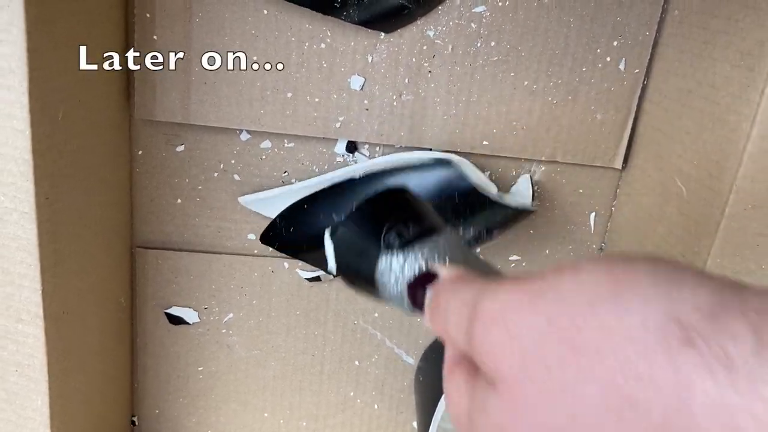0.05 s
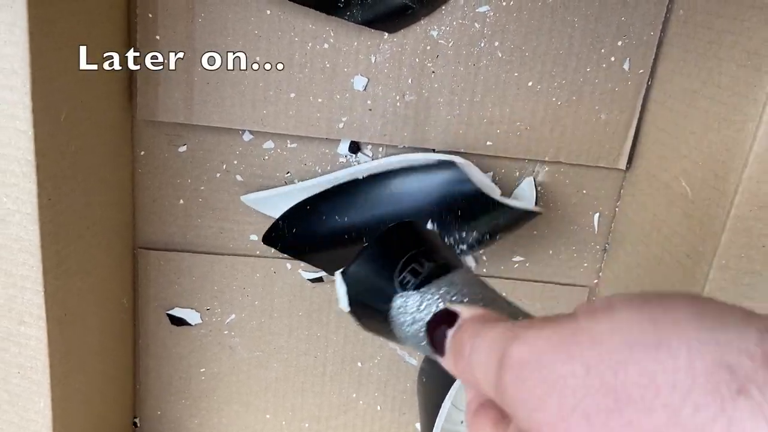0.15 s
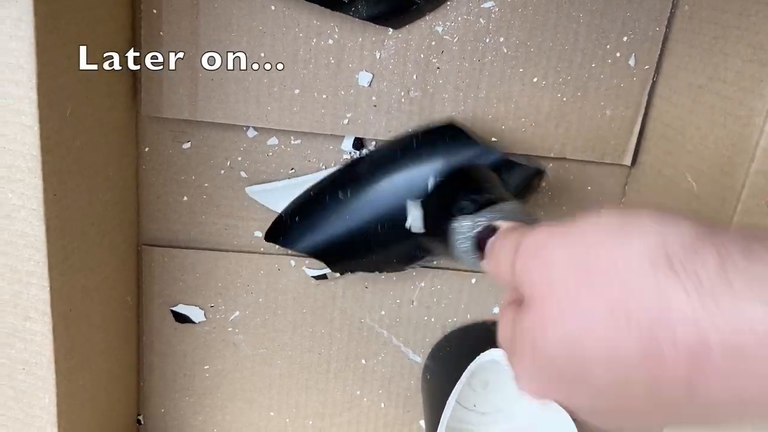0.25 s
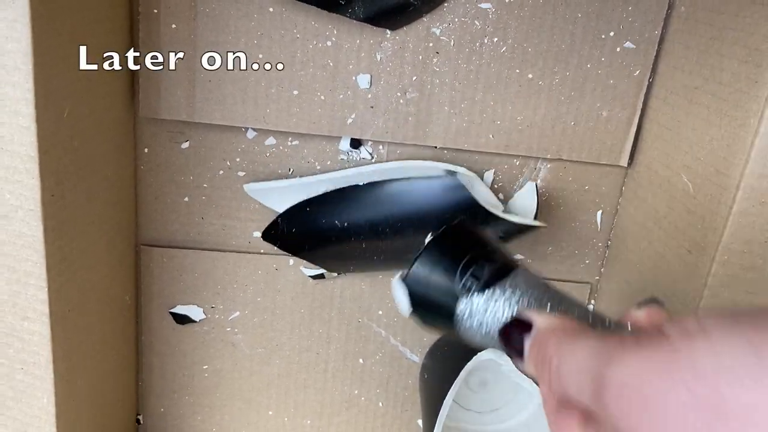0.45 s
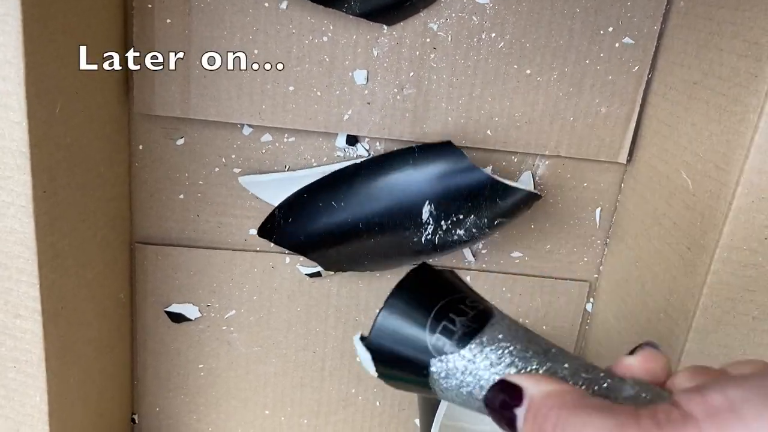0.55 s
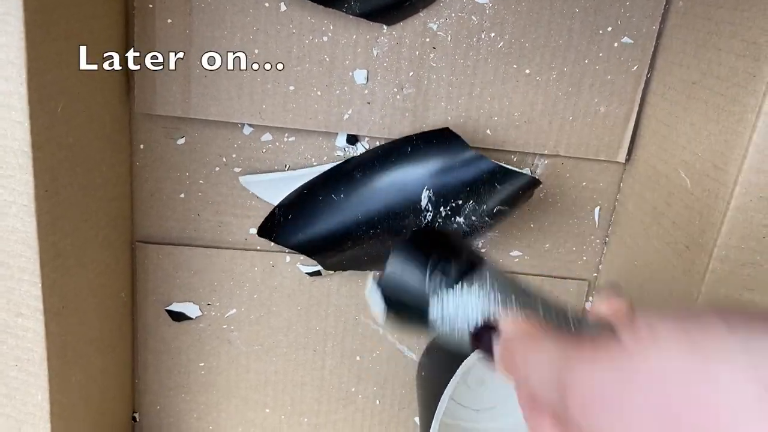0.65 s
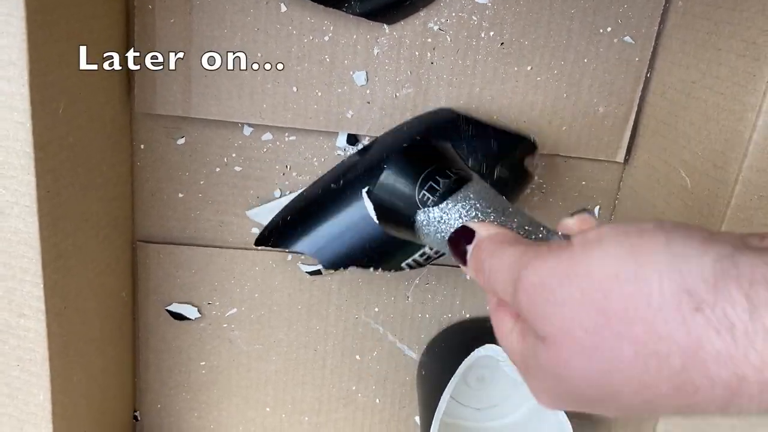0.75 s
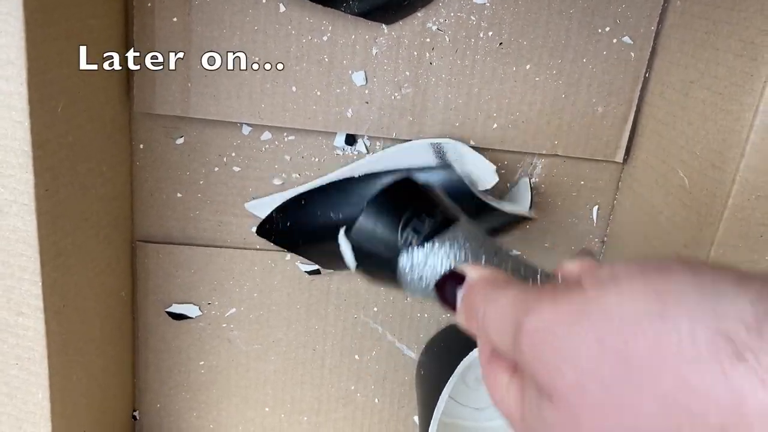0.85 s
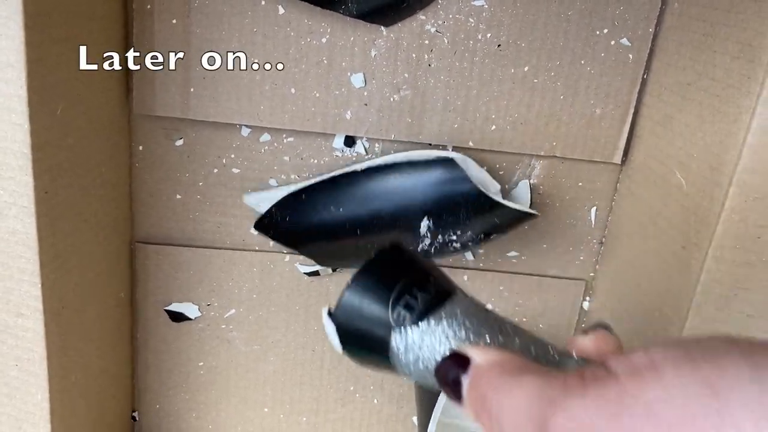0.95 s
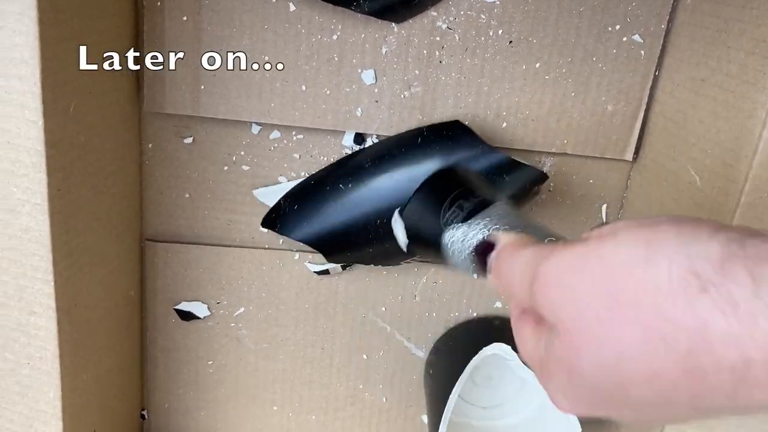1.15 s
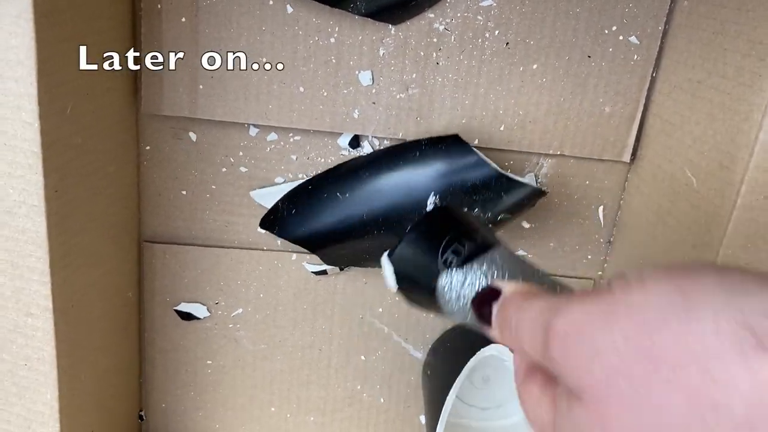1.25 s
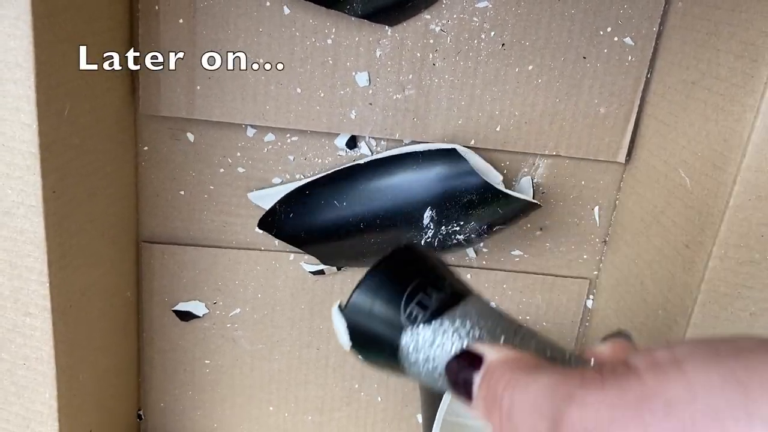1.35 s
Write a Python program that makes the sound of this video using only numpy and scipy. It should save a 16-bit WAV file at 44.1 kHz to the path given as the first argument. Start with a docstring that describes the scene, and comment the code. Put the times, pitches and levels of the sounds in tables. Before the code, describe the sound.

A hammer-like tool strikes a ceramic shard three times, close up in a small room. Each blow crunches, rings briefly and thumps the cardboard box beneath. Between blows the shard rocks, clinks and scrapes while tiny chips tick.

```python
"""In a small room, close to a phone, a hammer-like tool hits a curved ceramic shard in a cardboard box.
Each of the three blows crunches the edge, makes the trapped shard ring briefly and makes the box boom.
Once free, the shard rocks, clinks, taps and scrapes, while little chips tick around it.
Behind it all are a short echo, a low rumble and a faint hiss."""
import sys
import numpy as np
from scipy import signal
from scipy.fft import rfft, irfft
from scipy.io import wavfile

SR = 44100
rng = np.random.default_rng(int(sys.argv[2]) if len(sys.argv) > 2 else 0)


def unload_wav(signal):
    """Save mono or channel-first audio to the path in sys.argv[1] as 16-bit WAV at rate SR, clipped to [-1, 1]."""
    wavfile.write(
        sys.argv[1],
        SR,
        np.round(np.clip(np.atleast_2d(signal).T, -1, 1) * 32767).astype(np.int16),
    )


N = 61739
T = np.arange(N) / SR
FREQS = np.maximum(np.fft.rfftfreq(2 * N, 1 / SR), 1)


# three blows and one bounce (time [s], crunch level [dB], crush length [s], crunch brightness [dB/octave],
# ring level [dB], ring brightness [dB/octave], time the tool takes to hush the ring [s])
BLOWS = [(0.2048, -9, 0.0088, -1.4, -19, 3, 0.91), (0.2454, -16, 0.0081, 0, -27, -4.5, 0.12),
         (0.649, -10, 0.0075, 3.5, -10, 6, 0.05), (1.1064, -10, 0.0067, -0.5, -11, 0.34, 0.22)]
# tone of the crunch (frequency [Hz], level [dB])
CRUNCH_TONE = [(100, -18), (500, -35), (720, -14.5), (900, 3), (1400, -3), (2000, 0), (2500, -11),
               (3200, -10.5), (4100, -11), (5400, -8.5), (6300, -9.5), (9000, -14.5), (15500, -21.5)]
# notes of the shard pressed on the cardboard (pitch [Hz], level [dB], fade time [s])
PINNED_NOTES = [(368, -2.5, .07), (497, -11, .06), (890, -1.5, .04), (988, -5.5, .045), (1130, -4, .05),
                (1280, -1, .04), (1460, -6, .05), (1650, -6, .05), (1800, -4, .05), (1980, -2, .05),
                (3030, -3, .055), (3290, -3.5, .06), (4920, -8, .045), (5550, -4, .045)]

def blows():
    """The tool crushes the edge; the shard, pinned a bit differently each time, rings until hushed."""
    out = 0
    for start, crunch_db, crush_s, crunch_tilt, ring_db, ring_tilt, hush_s in BLOWS:
        crunch = noise(CRUNCH_TONE, crunch_tilt, grain=0.45) * fade(0.035, hold=crush_s)
        notes = [(hz * (1 + 0.012 * rng.uniform(-0.88, 1)), db + ring_tilt * np.log2(hz), fade_s)
                 for hz, db, fade_s in PINNED_NOTES]
        ringing = ring(notes, spread=1, hold=crush_s / 2) * fade(hush_s, hold=crush_s)
        blow = gain(crunch_db) * crunch + gain(ring_db) * ringing
        out += at(start, blow * rise(0.0015))
    return out


# pushes on the box floor (time [s], boom level [dB], thud level [dB], knock level [dB])
PUSHES = [(0.0223, -21, -45, -18), (0.104, -29, -31, -40.5), (.2115, -8, -12.5, -20.5),
          (0.263, -21.5, -18, -24), (.366, -19.5, -53, -24), (.472, -24, -54, -46),
          (0.6538, -14.5, -13, -13), (0.729, -27.5, -50, -32), (.817, -33.5, -60, -36),
          (0.869, -24.5, -47, -36.5), (0.9413, -39, -56.5, -37), (1.1106, -9.5, -15, -12)]
# notes of the box, the ground and the cardboard under the shard (pitch [Hz], level [dB], fade time [s])
BOX_NOTES = [(236, 0, .115), (238, -22, .26), (190, -17, .07)]
GROUND_NOTES = [(66, -5, 0.055), (92.6, 11, 0.051)]
PANEL_NOTES = [(362.6, -6.5, 0.037), (483.5, 1, 0.037), (871, -8, 0.033)]

def box():
    """Each push booms the box, thuds on the ground below and knocks hollowly on the cardboard."""
    boom = ring(BOX_NOTES, bend=-0.06, settle=0.007) * rise(0.0099)  # starts low under the load
    thud = ring(GROUND_NOTES) * rise(0.0099)
    knock = ring(PANEL_NOTES, bend=0.597, settle=0.0024) * rise(0.003)  # starts high and drops
    return sum(at(start, gain(boom_db) * boom + gain(thud_db) * thud + gain(knock_db) * knock)
               for start, boom_db, thud_db, knock_db in PUSHES)


# the box walls bending (time [s], level [dB])
FLEXES = [(0.149, -37), (0.253, -22), (1.141, -32.5), (1.215, -36.5)]

def walls():
    """As the weight shifts, the box walls bend and give one deep, soft note."""
    flex = ring([(58.6, 0, 0.12)]) * rise(0.02)
    return sum(at(start, gain(db) * flex) for start, db in FLEXES)


# the free shard rocking (time [s], ring level [dB], rattle level [dB], rattle length [s],
# favoured pitch [Hz], how fast notes weaken away from that pitch [dB/octave])
CLINKS = [(0.4671, -29.5, -28, 0.013, 2900, 1), (0.7016, -35.5, -31.5, 0.0035, 2600, 18),
          (.708, -37.5, -46, .003, 4958, 50), (0.8321, -44, -39.5, 0.0073, 4320, 23.5),
          (0.865, -45, -47.5, 0.013, 1930, 59.5), (0.9485, -40, -34.5, 0.004, 5540, 47.5),
          (0.952, -37.5, -46.5, 0.003, 3610, 29)]
# notes of the free shard (pitch [Hz], level [dB], fade time [s])
SHARD_NOTES = [(1476, -3, .28), (1738, -9, .08), (1940, -3, .18), (2298, -10, .1), (2453, -4, .13),
               (2640, -4, .14), (3052, 1, .075), (3237, -7, .17), (3612, -10, .12), (3836, -3, .105),
               (4404, -7, .11), (4958, -2, .09), (5420, -4, .075), (5612, -3, .08), (6158, -5, .08)]

def clinks():
    """The shard rattles on loose chips and rings on; each spot it touches brings out different notes."""
    out = 0
    for start, ring_db, rattle_db, rattle_s, favoured_hz, falloff in CLINKS:
        notes = [(hz, db - falloff * abs(np.log2(hz / favoured_hz)), fade_s)
                 for hz, db, fade_s in SHARD_NOTES]
        rattle = noise(CHIP_TONE, tilt=-4.5, grain=0.21) * fade(0.069, hold=rattle_s)
        ringing = ring(notes, spread=0.54, hold=rattle_s)
        clink = gain(ring_db) * ringing + gain(rattle_db) * rattle
        out += at(start, clink * rise(0.00016))
    return out


# the broken edge touching the cardboard (time [s], level [dB])
TAPS = [(0.06, -36), (.297, -36.5), (.3035, -32), (.3125, -29.5), (.375, -30.5), (.3975, -37),
        (0.4278, -30.5), (0.8659, -35), (0.9409, -42)]
# notes of one tap (pitch [Hz], level [dB], fade time [s])
TAP_NOTES = [(1600, -3, 0.017), (1910, 9, 0.011), (2180, -2, 0.02)]

def taps():
    """The broken edge stutters over the cardboard in short, dull ticks."""
    return sum(at(start, gain(db) * ring(TAP_NOTES, spread=0.84) * rise(0.00016)) for start, db in TAPS)


# chips ticking, plus one light tap of the tool at 0.0207 s (time [s], level [dB], brightness [dB/octave])
CHIPS = [(.0065, -32, -3), (0.0207, -27, -3), (0.08, -34, -6), (0.1317, -34, -3), (0.2125, -16, -0.5),
         (0.3225, -33, -0.5), (0.3649, -29.5, -1.5), (0.415, -28.5, 7), (.428, -48, 3), (0.4459, -23, -2),
         (0.513, -35, 2), (0.5388, -34.5, 4.5), (.6572, -20, -4), (0.7299, -27, 0), (0.7779, -30, 1.5),
         (0.785, -36.5, -2), (0.813, -35, 3), (0.9344, -35, 2), (1.0661, -37.5, -2), (1.167, -36, 3),
         (1.234, -44, 2.5), (1.2879, -33, 3), (1.3611, -44.5, 3)]
# tone of a chip (frequency [Hz], level [dB])
CHIP_TONE = [(200, -21.5), (900, -8.5), (1500, -4), (2200, 2), (3200, -7.5), (6000, -4), (10000, -9.5),
             (15500, -11)]
# a splinter pinging (time [s], level [dB])
PINGS = [(.730, -39), (0.831, -37.5)]
# notes of the splinter (pitch [Hz], level [dB], fade time [s])
SPLINTER_NOTES = [(9650, 0, .07), (10500, -5, .06)]

def chips():
    """Small chips tick as they crack off or land, and the tool taps lightly once near the start; one splinter
    pings twice."""
    tick_shape = fade(0.029, hold=0.00025)
    ticks = sum(at(start, gain(db) * noise(CHIP_TONE, tilt) * tick_shape) for start, db, tilt in CHIPS)
    pings = sum(at(start, gain(db) * ring(SPLINTER_NOTES, spread=0.9)) for start, db in PINGS)
    return ticks + pings


# loudness of the shard sliding on the cardboard (time [s], level [dB])
SCRAPE_LEVEL = [(0, -44), (.12, -52), (.16, -79), (.22, -27.5), (.30, -43), (.35, -46), (.41, -47.5),
                (.47, -40.5), (.53, -54.5), (.62, -61.5), (.67, -42.5), (.75, -41.5), (.80, -53),
                (.86, -43.5), (.92, -43.5), (1.0, -53), (1.05, -63), (1.09, -43.5), (1.16, -41.5),
                (1.3, -74.5)]
# tone of the grit (frequency [Hz], level [dB])
GRIT_TONE = [(100, 4.5), (240, 5), (400, 2), (1000, -2), (2000, -7.5), (3500, -7), (5500, -10.5),
             (8000, -9.5), (15500, -19)]

def scrape():
    """Grit grinds under the sliding shard and makes it sing faintly."""
    grit = noise(GRIT_TONE, grain=0.38)
    singing = signal.fftconvolve(grit, ring(SHARD_NOTES))[:N]
    return (grit + gain(-9) * singing / singing.std()) * over_time(SCRAPE_LEVEL)


# tone of the room's echo (frequency [Hz], level [dB])
ECHO_TONE = [(60, -11), (230, 7.5), (700, -20), (2000, -3), (5000, -5), (10000, -7.5), (15500, -3.5)]

def room_echo(sound):
    """The small room answers each sound with a short, blurred echo."""
    tail = noise(ECHO_TONE) * fade(0.13) * rise(0.0043)
    return gain(-16) * signal.fftconvolve(sound, tail / np.linalg.norm(tail))[:N]


# loudness of the rumble (time [s], level [dB])
RUMBLE_LEVEL = [(0, -51), (.4, -41), (.55, -51), (.62, -64), (.76, -47), (1.06, -54), (1.24, -41.5),
                (1.4, -46.5)]
# tones of the rumble and of the room's air (frequency [Hz], level [dB])
RUMBLE_TONE = [(20, -32.5), (35, -8.5), (52, -3.5), (80, -17.5), (130, -20), (300, -46.5), (1000, -74.5)]
AIR_TONE = [(50, 0), (200, 2), (500, -14), (2000, -20), (6000, -20.5), (15500, -32)]

def background():
    """A low rumble swells and sinks over the faint, steady hiss of the air."""
    return noise(RUMBLE_TONE) * over_time(RUMBLE_LEVEL) + gain(-58.5) * noise(AIR_TONE)


def gain(db):
    """Turn decibels into a number to multiply by."""
    return 10 ** (np.asarray(db) / 20)


def over_hz(points):
    """Join (frequency [Hz], value) points into a curve, giving each octave equal room."""
    hz, value = np.array(points, float).T
    return np.interp(np.log(FREQS), np.log(hz), value)


def over_time(points):
    """Join (time [s], level [dB]) points into a loudness curve."""
    return gain(np.interp(T, *np.array(points, float).T))


def noise(tone, tilt=0, grain=0):
    """Noise of strength 1; tilt [dB/octave] brightens it above 400 Hz, grain makes it crackle."""
    hiss = rng.standard_normal(N)
    roughness = np.repeat(rng.standard_normal(N // 32 + 1), 32)[:N]
    crackle = hiss * np.exp(grain * roughness)
    tone_db = over_hz(tone) + tilt * np.log2(np.maximum(FREQS / 400, 1))
    shaped = irfft(rfft(crackle, 2 * N) * gain(tone_db))[:N]
    return shaped / shaped.std()


def fade(fade_s, hold=0):
    """Stay at full level for hold seconds, then fall by 60 dB in each fade time."""
    return np.exp(-np.log(1000) * np.maximum(T - hold, 0) / fade_s)


def rise(seconds):
    """Climb evenly from silence to full level."""
    return np.minimum(T / seconds, 1)


def ring(notes, spread=0, hold=0, bend=0, settle=1):
    """A struck object's notes fade together; spread puts them out of step, as a rough touch does."""
    clock = T + bend * settle * (1 - np.exp(-T / settle))  # pitch starts off by the share bend
    ringing = sum(gain(db) * fade(fade_s, hold) * np.sin(2 * np.pi * (hz * clock + spread * rng.random()))
                  for hz, db, fade_s in notes)
    strength = np.sqrt(sum(gain(db) ** 2 for _, db, _ in notes) / 2)
    return ringing / strength


def at(start, sound):
    """Place a sound at its start time."""
    return np.concatenate([np.zeros(max(int(start * SR), 0)), sound])[:N]


# how far the left microphone's wave runs ahead of the right's (frequency [Hz], lead [radians])
LEFT_LEAD = [(20, 0), (400, -.2), (800, .3), (1400, -.15), (2100, .15), (2700, 1.2), (3450, .5), (4400, .7),
             (5200, .2), (6700, 2.9), (7700, 3.2), (9000, 4.6), (9800, 6.2), (11100, 6.4), (12700, 9.1),
             (14000, 9.5), (15700, 12.4)]
# how much louder the left microphone is (frequency [Hz], left minus right [dB])
LEFT_BALANCE = [(60, 1), (220, -1.76), (450, -1.5), (700, -7.5), (950, 4), (1500, 2), (2000, 1),
                (2900, -5.5), (4000, 0), (8000, 2)]

def scene():
    """Everything reaches the phone's two microphones, each with its own timing and level."""
    near = blows() + box() + walls() + clinks() + taps() + chips() + scrape()
    spectrum = rfft(near + room_echo(near) + background(), 2 * N)
    lean = gain(over_hz(LEFT_BALANCE) / 2)
    left = irfft(spectrum * lean)[:N]
    right = irfft(spectrum / lean * np.exp(-1j * over_hz(LEFT_LEAD)))[:N]
    return np.array([left, right])


def record(dry):
    """The phone drops the deepest bass, rounds off the loudest peaks and cuts the highest treble."""
    low_cut_hz, high_cut_hz = 41, 15900
    thinned = signal.sosfilt(signal.butter(2, low_cut_hz, "high", fs=SR, output="sos"), dry)
    rounded = 0.95 * np.tanh(thinned / 0.95)
    return signal.sosfilt(signal.ellip(8, 0.2, 70, high_cut_hz, fs=SR, output="sos"), rounded)


dry = scene()
out = record(dry)
unload_wav(out)
```